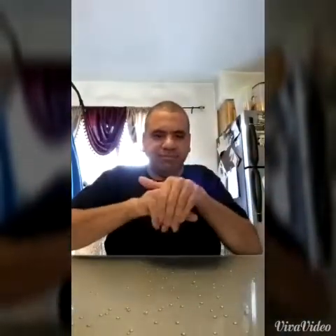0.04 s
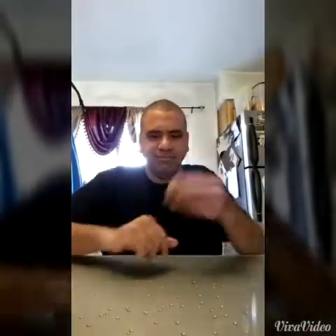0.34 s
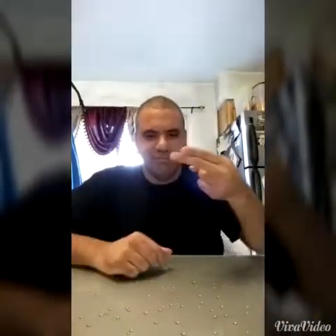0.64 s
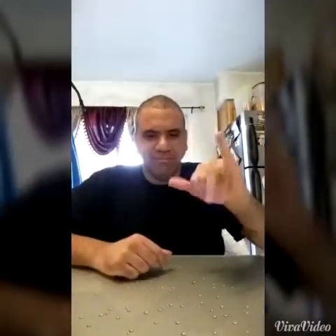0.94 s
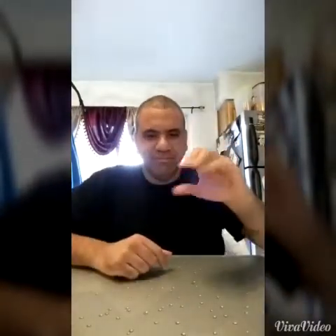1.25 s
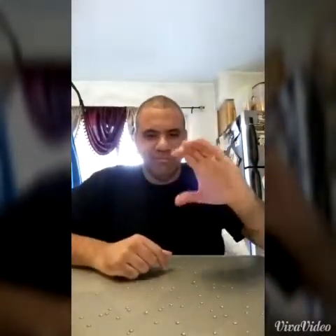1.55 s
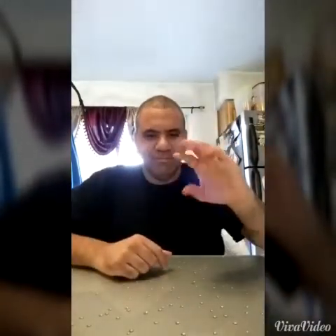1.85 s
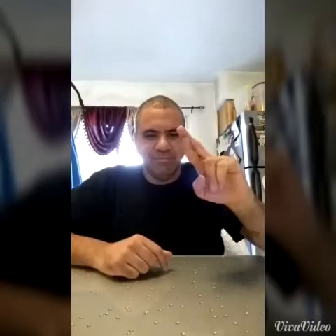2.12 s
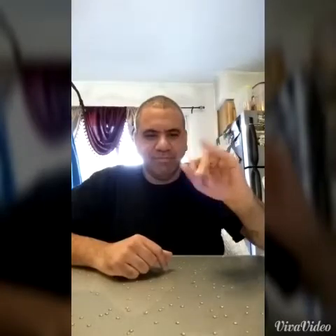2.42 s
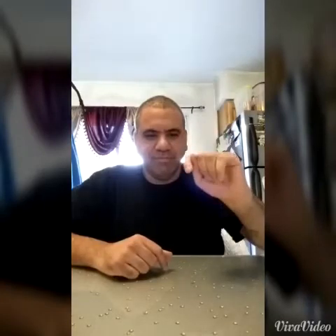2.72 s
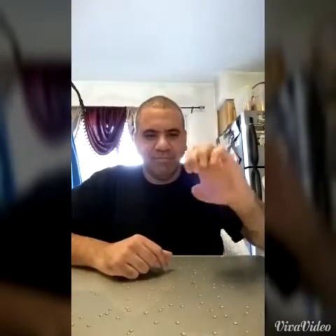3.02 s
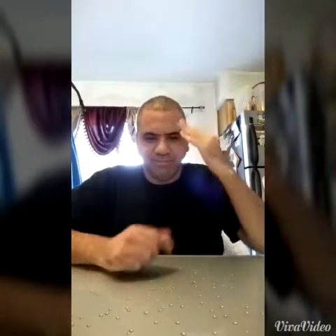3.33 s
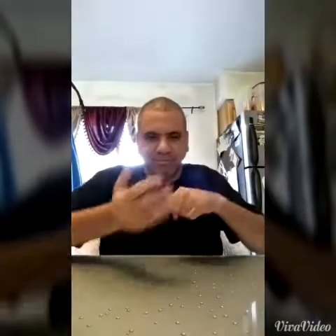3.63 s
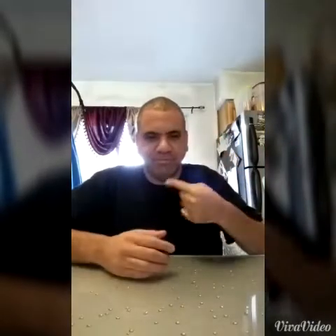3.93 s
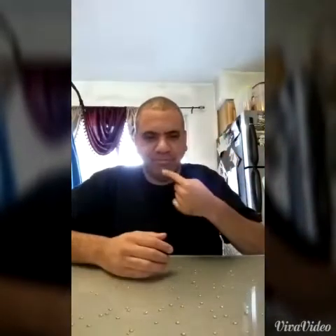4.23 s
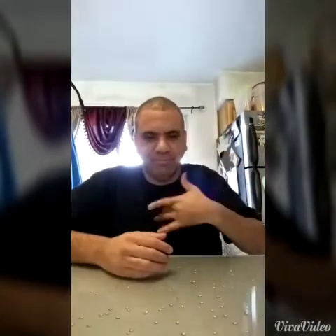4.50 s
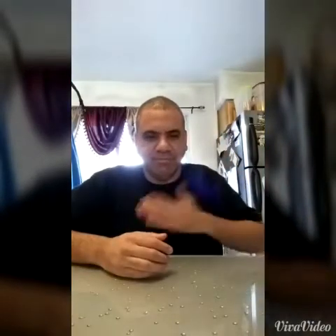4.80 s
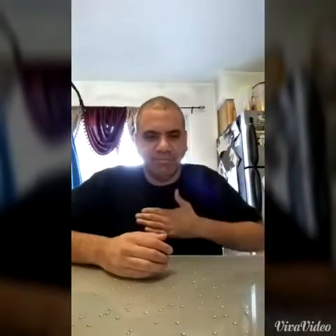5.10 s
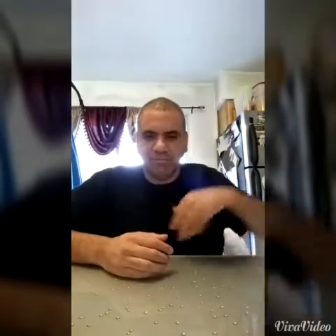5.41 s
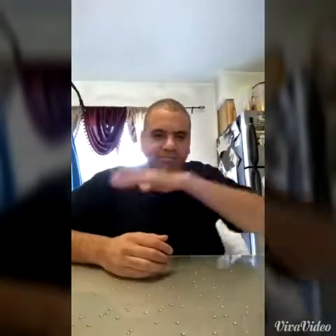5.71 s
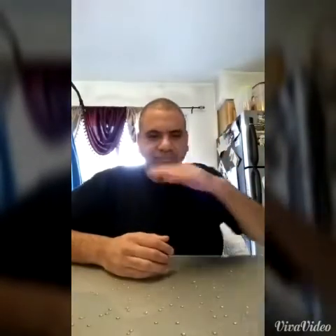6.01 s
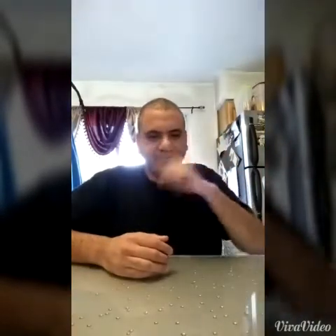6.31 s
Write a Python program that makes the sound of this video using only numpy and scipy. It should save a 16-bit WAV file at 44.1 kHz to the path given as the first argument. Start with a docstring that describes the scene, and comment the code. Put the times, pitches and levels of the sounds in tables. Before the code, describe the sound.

A fridge hums steadily throughout, low wavering tones over the soft rush of its fan, heard in a quiet kitchen from a phone standing on the table. Around 0.6 seconds a shirt rustles and a sleeve swishes with a thin zipping sound, along with a light bump on the tabletop. Faint swishes of cloth and dry skin come and go, with tiny finger ticks near 2.9 and 3.6 seconds. At about 3.7 seconds a forearm drags on the table with a short low drone, then settles in two soft bumps near 3.9. At 4.9 seconds a hand knocks once, sharply, the loudest sound: the top thuds and rings briefly, with a short echo off the walls. From 5.3 to 5.9 seconds sleeves swish, zip and rustle again. Only faint stirring and the hum remain until the end, at about 6.7 seconds.

```python
"""A hand knocks once, sharply, on a kitchen table: the top thuds and rings, and the walls answer.
Before the knock, a forearm drags on the top with a short drone and settles in soft bumps.
Arms move throughout: sleeves swish and zip, shirt folds rustle, dry skin sizzles and ticks faintly.
Behind it all a fridge hums over the rush of its fan, heard from a phone standing on the same table."""
import sys
import numpy as np
from scipy import signal
from scipy.fft import rfft, irfft
from scipy.io import wavfile

SR = 44100
rng = np.random.default_rng(int(sys.argv[2]) if len(sys.argv) > 2 else 0)


def transcribe(signal):
    """Save signal, clipped to [-1, 1], as a 16-bit WAV file at the path in sys.argv[1]."""
    frames = np.atleast_2d(signal).T
    limited = np.clip(frames, -1, 1)
    pcm = np.round(limited * 32767).astype(np.int16)
    wavfile.write(sys.argv[1], SR, pcm)


N = 288855
TIME = np.arange(N) / SR
FREQ = np.maximum(np.arange(N // 2 + 1) * SR / N, 1)


def undb(db):
    """Decibels to gain."""
    return 10 ** (np.asarray(db) / 20)


def unit(x):
    """Scale to rms 1."""
    return x / np.sqrt(np.mean(x ** 2))


def colour(points):
    """An EQ curve through (freq_hz, gain_db) points, falling 12 dB an octave beyond the ends."""
    hz, db = np.transpose(points)
    ends = np.minimum(FREQ / hz[0], 1) * np.minimum(hz[-1] / FREQ, 1)
    return undb(np.interp(np.log(FREQ), np.log(hz), db)) * ends ** 2


def walk(rate_hz):
    """Smooth random wander with rms 1."""
    return unit(irfft(rfft(rng.standard_normal(N)) / (1 + (FREQ / rate_hz) ** 4), N))


def diffuse(points):
    """Coloured stereo noise from all round: narrow in the low mids, wider in the treble and rumble."""
    # stereo width, side over mid: freq_hz, side_db
    width = [(60, -7), (120, -7), (200, -14), (350, -18), (680, -4), (1300, 0.5)]
    hz, db = np.transpose(width)
    spread = undb(np.interp(np.log(FREQ), np.log(hz), db))
    mid, side = rfft(rng.standard_normal((2, N)))
    pair = np.array([mid + spread * side, mid - spread * side])
    return unit(irfft(pair * colour(points) / np.sqrt(1 + spread ** 2), N))


def convolve(x, response):
    """Pass a sound through an impulse response."""
    return signal.fftconvolve(np.atleast_2d(x), np.atleast_2d(response), axes=-1)[:, :N]


def from_right(x, lag_ms, shade_db, shade_hz=5800, octaves=0.52):
    """Sound from the right reaches the left channel a little later and with less presence."""
    shade = undb(shade_db * np.exp(-(np.log2(FREQ / shade_hz) / octaves) ** 2))
    delay = np.exp(-2j * np.pi * FREQ * lag_ms / 1000)
    return np.array([irfft(rfft(x[0]) * shade * delay, N), x[1]])


def fridge(air_db=-44, phase_wander=0.28, flutter_db=0.8):
    """Motor tones waver in level and phase over the rush of the fan."""
    # motor and fan tones: pitch_hz, level_db, waver_db
    hum = [(53.8, -62, 0), (119.4, -64.5, 2), (214.1, -47, 0.6), (254.4, -55, 2.5), (314.9, -56.5, 3),
           (318.9, -51.5, 2.5), (336.2, -50, 1.8), (425.6, -60.5, 1), (938, -74.5, 2.5)]
    # air rushing through the fan: freq_hz, gain_db
    air_eq = [(20, -22.5), (48, -3), (100, -8), (160, 0.5), (215, -2), (255, -1.5), (283, -3), (325, 0.5),
              (375, -3.5), (530, -8), (800, -16), (1150, -24.5), (1650, -31), (2100, -27), (2900, -48)]
    tones = 0
    for hz, db, waver_db in hum:
        phase = 2 * np.pi * (hz * TIME + rng.random()) + phase_wander * waver_db * walk(2.17)
        tones += undb(db) * unit(undb(waver_db * walk(8.2)) * np.sin(phase))
    return tones + undb(air_db + flutter_db * walk(26)) * diffuse(air_eq)


def fingers(t60_s=0.03):
    """Dry fingers give short bright ticks as they touch and part."""
    # finger ticks: start_s, level_db
    ticks = [(2.932, -52), (2.937, -56), (3.589, -56), (4.612, -66), (6.359, -58)]
    # a tick's brightness: freq_hz, gain_db
    tick_eq = [(3500, -10), (5000, -3), (9000, -3), (14500, -2)]
    envelope = sum((TIME >= s) * undb(db - 60 * np.abs(TIME - s) / t60_s) for s, db in ticks)
    return envelope * diffuse(tick_eq)


def gesture(peak_s, length_s):
    """A movement speeds up and slows down: a bell envelope, length_s wide at half power."""
    return .5 ** (2 * ((TIME - peak_s) / length_s) ** 2)


def sliding(strokes, linger_db=-4, t60_s=0.95):
    """Envelope of (peak_s, length_s, level_db) strokes: they add in power and linger in the room."""
    power = sum((undb(db) * gesture(s, length_s)) ** 2 for s, length_s, db in strokes)
    decay = undb(-60 * TIME / t60_s) ** 2
    linger = np.abs(convolve(power, decay / decay.sum())[0])
    return np.sqrt(power + undb(linger_db) ** 2 * linger)


def zips(trim_db=-3, patchy_db=3.5, rasp_rad=0.85, unsteady=0.007, echo_db=-4, echo_t60_s=0.22):
    """A sleeve's weave catches and slips, singing raspily at pitches that follow the arm's speed."""
    # zipping patches of weave: start_s, end_s, top_hz, sag_share (pitch lost at the ends), relative_db
    patches = [(.53, .80, 13650, .16, -59), (.56, .77, 12900, .12, -61), (.565, .71, 11650, .05, -57),
               (.62, .81, 13300, .24, -63), (.55, .81, 10700, .2, -62), (.53, .64, 8750, .04, -60),
               (.66, .745, 8950, .06, -57), (.75, .82, 9000, .04, -61), (5.60, 5.72, 13150, .22, -61),
               (5.60, 5.83, 12650, .25, -60), (5.63, 5.82, 11000, .19, -58), (5.66, 5.76, 9050, .04, -56),
               (5.69, 5.85, 13100, .28, -60), (5.72, 5.81, 12650, .08, -61)]
    dry = np.zeros((2, N))
    rasp = rasp_rad * np.array([walk(150), walk(150)])
    grip = undb(patchy_db * walk(28))
    wobble = unsteady * walk(29.5)
    for start_s, end_s, top_hz, sag, db in patches:
        stroke = (2 * TIME - start_s - end_s) / (end_s - start_s)  # -1 to 1 across the zip
        on = np.flatnonzero(np.abs(stroke) < 1)
        patch = (on + rng.integers(N)) % N  # each patch has its own stretch of texture
        pitch_hz = top_hz * (1 - sag * stroke[on] ** 2 + wobble[patch])
        phase = 2 * np.pi * np.cumsum(pitch_hz) / SR + rasp[:, patch]
        swell = np.sqrt(1 - stroke[on] ** 2)
        dry[:, on] += undb(db + trim_db) * swell * grip[patch] * np.sin(phase)
    room = unit(rng.standard_normal((2, N)) * undb(-60 * TIME / echo_t60_s)) / np.sqrt(N)
    return dry + undb(echo_db) * convolve(dry, room)


def swishes(trim_db=-0.5, grain_db=1.76, stir_db=-78):
    """Sleeve fibres catch in a grainy hiss, and dry skin sizzles above it."""
    # arm and hand strokes: peak_s, length_s, relative_db, sizzle_db (skin over cloth)
    strokes = [(0.005, 0.05, -55, -4.5), (.33, 0.14, -66, -12), (0.699, 0.17, -60.5, -4),
               (1.318, 0.027, -61.5, -5), (2.337, 0.066, -74, 1.5), (2.553, 0.051, -62, -1.5),
               (2.931, 0.0093, -65, -1), (2.955, 0.041, -64.5, -1.5), (3.642, 0.072, -63.5, -3.5),
               (3.66, 0.023, -63, -10), (4.62, 0.023, -65.5, -6), (5.345, 0.11, -55.5, -0.5),
               (5.406, 0.054, -51.5, -4), (5.55, .25, -85, -17), (5.73, 0.13, -56, -5.5),
               (6.058, 0.1, -68, -22), (6.453, 0.43, -72, -22)]
    # sliding cloth: freq_hz, gain_db
    cloth_eq = [(800, -1), (1600, -6), (2600, -5.5), (3300, -11.5), (5000, -2), (5900, -9), (6850, 2.5),
                (7500, -7.5), (8200, -2.5), (8750, 0.5), (9300, -7), (10500, -10.5), (13000, -5),
                (14500, -18)]
    # sliding dry skin: freq_hz, gain_db
    skin_eq = [(8200, -12), (8750, 6), (9300, 1.5), (10500, 0.5), (11200, -3), (12300, 2.5), (14500, -23)]
    cloth = sliding([(s, length_s, db) for s, length_s, db, _ in strokes])
    cloth = np.hypot(cloth, undb(stir_db))  # the shirt never lies quite still
    skin = sliding([(s, length_s, db + sizzle_db) for s, length_s, db, sizzle_db in strokes])
    grain = undb(trim_db + grain_db * walk(140))
    return grain * (cloth * diffuse(cloth_eq) + skin * diffuse(skin_eq))


def shirt():
    """The shirt's folds shift and rustle as an arm lifts."""
    # shifting folds: peak_s, length_s, level_db
    folds = [(0.63, 0.11, -41), (5.38, 0.2, -57.5), (5.655, 0.22, -48.5)]
    # their dull rustle: freq_hz, gain_db
    rustle_eq = [(70, 0), (145, 2.5), (260, 1.5), (470, -1), (700, -18.5), (1200, -25), (2400, -32.5),
                 (3600, -34.5)]
    return sum(undb(db) * gesture(s, length_s) for s, length_s, db in folds) * diffuse(rustle_eq)


def drag(release_s=3.73, peak_db=-41.5, rise_db_per_s=63, fall_db_per_s=252, slip_hz=120):
    """A forearm sticks and slips near the table's main mode; the drone swells until it lets go."""
    age_s = TIME - release_s
    level_db = peak_db + np.minimum(rise_db_per_s * age_s, -fall_db_per_s * age_s)
    phase = 2 * np.pi * slip_hz * TIME + 0.65 * walk(12)
    return undb(level_db) * unit(np.sin(phase))


def kitchen(room_db=-28, room_t60_s=0.43, tiles_db=-46, tiles_t60_s=0.7, build_s=0.00084):
    """Dense echoes from walls and cupboards; hard surfaces hold the treble a little longer."""
    # body of the reverb: freq_hz, gain_db
    room_eq = [(40, -38), (130, -1), (220, -0.5), (400, 1), (800, -5), (1200, -21.5), (2200, -18),
               (3300, -30.5), (5000, -28), (9000, -28.5), (12000, -30.5), (14500, -51)]
    # bright tail off the hard surfaces: freq_hz, gain_db
    tiles_eq = [(1200, -3), (2200, 0), (3300, -14), (5000, -11), (9000, -17), (12000, -25), (14500, -35)]
    dull = undb(room_db - 60 * TIME / room_t60_s) * diffuse(room_eq)
    bright = undb(tiles_db - 60 * TIME / tiles_t60_s) * diffuse(tiles_eq)
    return (dull + bright) * (1 - np.exp(-TIME / build_s))


def slapback(thud):
    """The top radiates its thud, and the near walls slap it back."""
    # share of the bending wave given to the air: freq_hz, gain_db
    radiated_eq = [(150, -22), (480, 0.5), (900, 1.5), (2000, -5), (12000, -5)]
    # first wall reflections: delay_s, gain_db
    walls = [(.0205, -11), (.0255, -9.5), (.068, -22)]
    airborne = irfft(rfft(thud) * colour(radiated_eq), N)
    return sum(undb(db) * np.interp(TIME - s, TIME, airborne, left=0) for s, db in walls)


def tabletop(thud_db=22, ring_db=-25.5, build_s=0.008, snap_db=-27, snap_s=0.003, snap_t60_s=0.0045):
    """A tap on the top: a bending wave whose treble outruns its bass, a snap of skin, ringing modes."""
    # the first bending wave: freq_hz, gain_db
    thud_eq = [(45, -27), (70, -16), (125, 11.5), (220, -17), (380, 5), (620, -3.5), (900, -12),
               (1400, -27), (2400, -21), (3500, -45), (5000, -30), (7500, -62), (12000, -40)]
    # skin snapping on the top: freq_hz, gain_db
    snap_eq = [(1500, 0), (5000, 0), (8000, -10), (12000, -19), (14500, -28)]
    # tabletop modes: pitch_hz, relative_db, t60_s
    modes = [(57, -13, 0.27), (133.8, 4.5, 0.34), (152, -7, 0.44), (164.6, -11, 0.78), (216, -24.5, 0.51),
             (306.5, -13, 0.32), (418, -11, 0.24), (516, -8.5, 0.32), (613, -15, 0.35), (716, -25, 0.31),
             (778, -15, 0.19), (847, -10, 0.14), (968, -7, 0.1), (1050, -23, 0.13), (2300, -37, .55)]
    travel_ms = 1.915  # the wave's travel time at 1 kHz
    bend = 4 * np.pi * travel_ms * np.sqrt(FREQ / 1000)
    thud = undb(thud_db) * irfft(colour(thud_eq) * np.exp(-1j * bend), N) * (TIME < .5)
    snap = undb(snap_db - 60 * np.abs(TIME - snap_s) / snap_t60_s) * diffuse(snap_eq)
    ring = 0
    for hz, db, t60_s in modes:
        arrival_phase = np.interp(hz, FREQ, bend)  # each mode swings on from the bending wave
        ring += undb(ring_db + db - 60 * TIME / t60_s) * np.cos(2 * np.pi * hz * TIME - arrival_phase)
    return thud, snap, ring * (1 - np.exp(-TIME / build_s))


def knocks():
    """Each blow pushes on the table: long and dull for a soft arm, short and sharp for the knock."""
    # blows on the table: start_s, relative_db, softness_ms
    blows = [(0.627, -28, 1.1), (3.877, -21, 4.1), (3.926, -25, 3.4), (4.907, -16.5, 0.03),
             (4.9106, 1.5, 0.013)]
    force = np.zeros(N)
    for start_s, db, softness_ms in blows:
        age_ms = np.maximum(TIME - start_s, 0) * 1000
        push = age_ms * np.exp(-age_ms / softness_ms)
        momentum = undb(db) * (1 + softness_ms ** 2)  # a soft, heavy arm carries more
        force += momentum * push / push.sum()
    thud, snap, ring = tabletop()
    return convolve(force, thud + snap + ring + slapback(thud) + kitchen())


def scene():
    """A bed of fridge hum, with the table and the arms close by, leaning to the right."""
    bed = from_right(fridge(), lag_ms=0.04, shade_db=-25)
    close = knocks() + drag() + swishes() + shirt() + zips() + fingers()
    return bed + from_right(close, lag_ms=0.165, shade_db=-15.5)


def record(dry, hiss_db=-72, left_db=-0.9, top_hz=14750):
    """The phone adds faint hiss, hears a little less on the left and cuts the highest treble."""
    # the phone's own hiss: freq_hz, gain_db
    hiss_eq = [(1000, -15), (3500, -1), (5000, -4.5), (6000, -21), (7000, -5.5), (9800, -13.5),
               (12300, 4.5), (14500, 0.5)]
    heard = dry * undb([[left_db], [0]]) + undb(hiss_db) * diffuse(hiss_eq)
    high_cut = signal.ellip(10, .2, 80, top_hz, fs=SR, output="sos")
    return signal.sosfilt(high_cut, heard)


dry = scene()
out = record(dry)
transcribe(out)
```